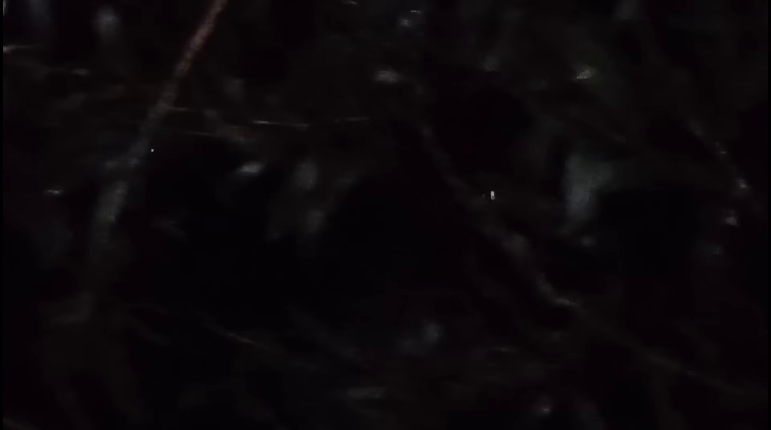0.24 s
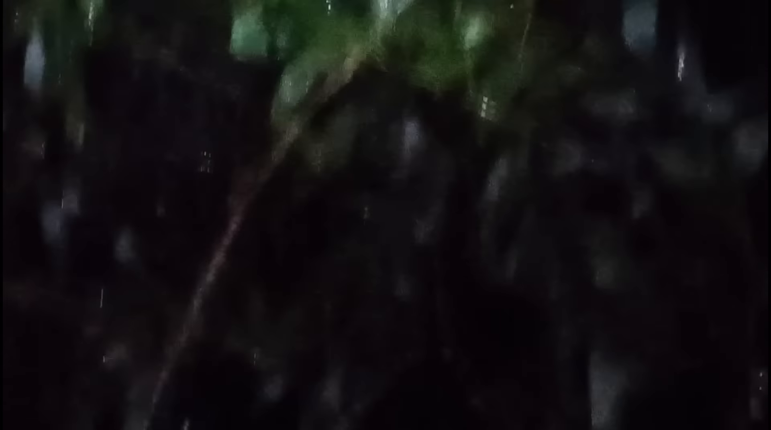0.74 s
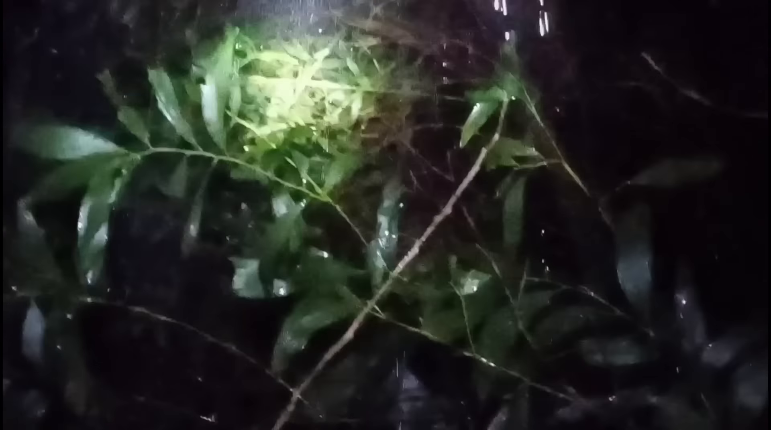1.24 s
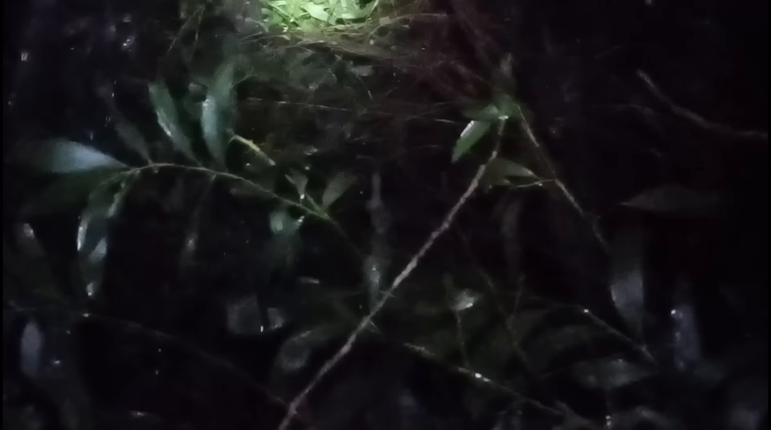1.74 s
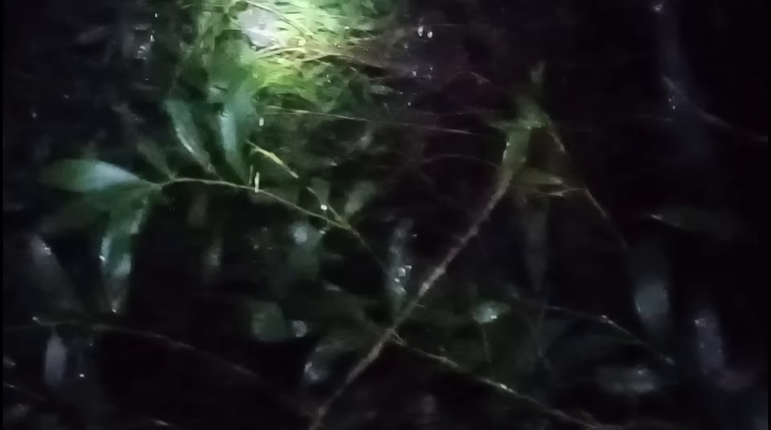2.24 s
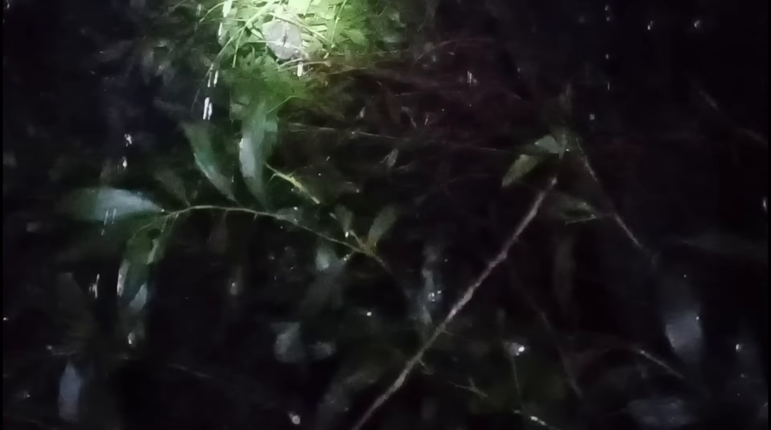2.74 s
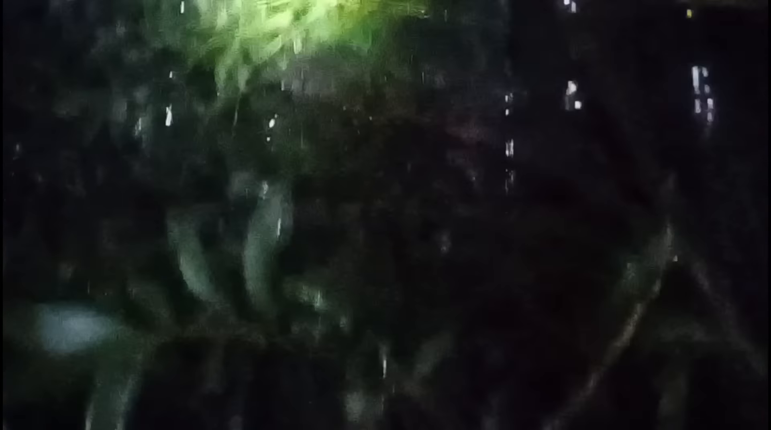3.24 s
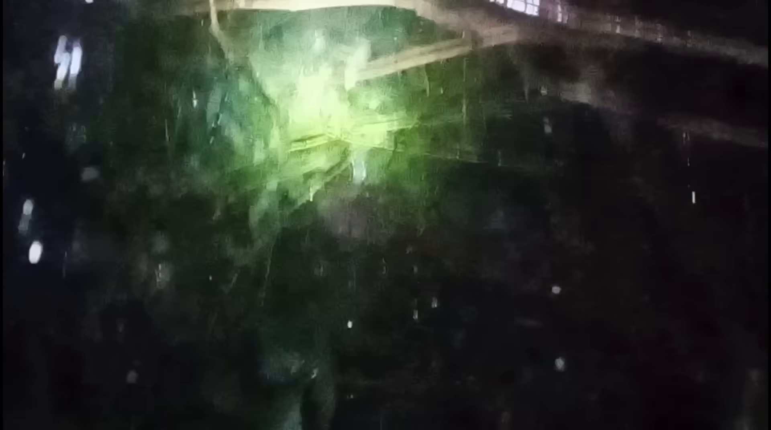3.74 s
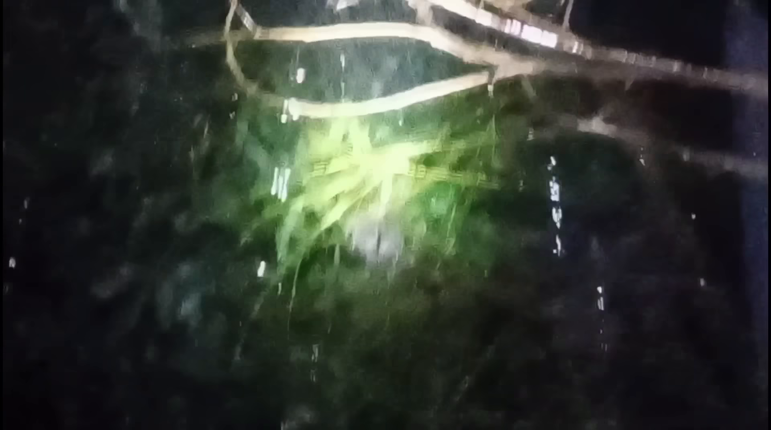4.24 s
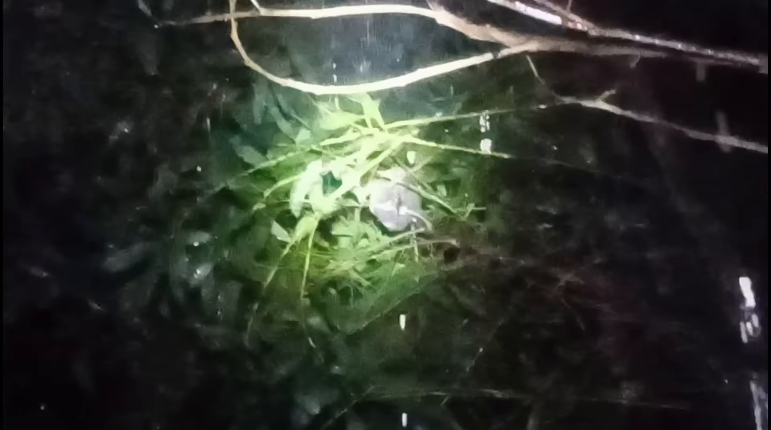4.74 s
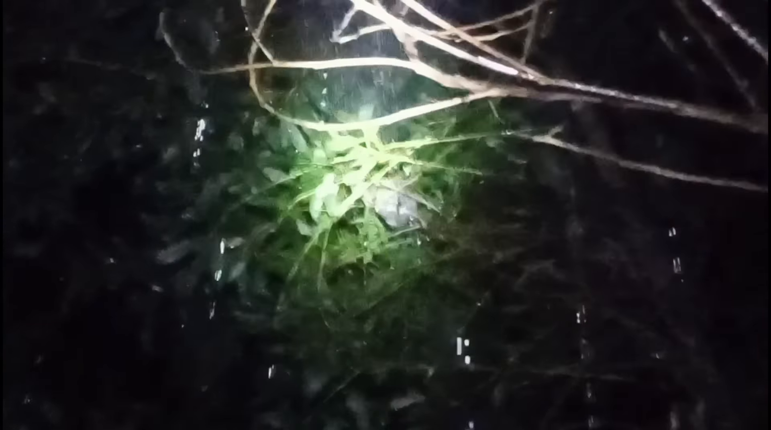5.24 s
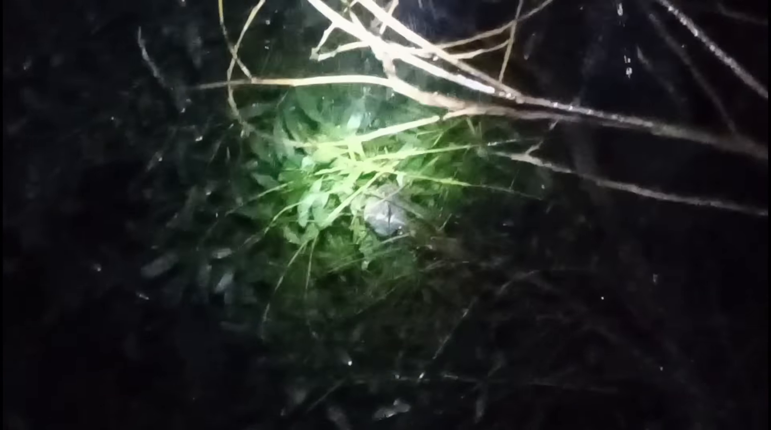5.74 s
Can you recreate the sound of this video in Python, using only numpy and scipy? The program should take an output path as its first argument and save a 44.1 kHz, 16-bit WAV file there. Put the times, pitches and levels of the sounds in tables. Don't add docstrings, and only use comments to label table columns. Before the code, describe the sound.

Steady rain falls on grass and leaves outdoors at night. Distant drops blend into a wide, even hiss, nearer ones patter, and the closest make single ticks and soft splats to either side. Past three seconds a breeze hits the left side of a hand-held phone microphone, adding low, lumpy rumble and dull thumps until the end.

```python
import sys
import numpy as np
from scipy import signal
from scipy.fft import rfft, irfft, next_fast_len
from scipy.io import wavfile
from scipy.ndimage import uniform_filter1d, map_coordinates

SR = 44100
rng = np.random.default_rng(int(sys.argv[2]) if len(sys.argv) > 2 else 0)


def transcribe(signal):
    frames = np.atleast_2d(signal).T
    limited = np.clip(frames, -1, 1)
    pcm = np.round(limited * 32767).astype(np.int16)
    wavfile.write(sys.argv[1], SR, pcm)


def gain_from_decibels(decibels):
    exponent = np.asarray(decibels, float) / 20
    return 10 ** exponent


N = 263713


def unit(x):
    return x / np.sqrt(np.mean(x ** 2) + 1e-20)


def along(points, hz):
    point_hz, value = np.transpose(points)
    return np.interp(np.log(hz + 1), np.log(point_hz + 1), value)


def curves(rows):
    s, *columns = np.transpose(rows)
    return [np.interp(np.arange(N) / SR, s, column) for column in columns]


def wobble(rate):
    knots = rng.standard_normal(int(N * rate / SR) + 4)
    return map_coordinates(knots, [np.arange(N) * rate / SR])


def filtered(x, response):
    size = next_fast_len(N + 8192)
    hz = np.fft.rfftfreq(size, 1 / SR)
    return irfft(rfft(x, size) * response(hz), size)[..., :N]


def causal(points):
    gain = gain_from_decibels(along(points, np.fft.rfftfreq(4096, 1 / SR)))
    cepstrum = irfft(np.log(gain))
    cepstrum[1:2048] *= 2
    cepstrum[2049:] = 0
    return irfft(np.exp(rfft(cepstrum)))[:2048]


# start_s, level_db, suction_to_push_ms (negative = push first)
STRONG_EDDIES = [(0.05, -35, 4), (2.45, -34, 4), (3.201, -29, -4.5), (3.453, -20.5, -4), (3.471, -22, 3.5),
                 (3.608, -25, 8), (3.724, -21, 5.5), (3.77, -20, 8.5), (3.94, -20.5, -4), (3.98, -14, 5.5),
                 (4.079, -25, -3.5), (4.117, -21, 8), (4.328, -24.5, 3.5), (4.403, -22, 5.5),
                 (4.517, -19.5, 5.5), (4.546, -19.5, 5.1), (4.629, -19.5, 4.2), (4.661, -21.5, 3),
                 (4.722, -23.5, 4), (4.807, -23.5, 2.5), (4.985, -20, 6), (5.061, -21, 3.5),
                 (5.078, -20, 3), (5.126, -17, 3.5), (5.338, -22, 4), (5.482, -23, -7.5), (5.574, -18, 4.5),
                 (5.741, -16.5, 4.5), (5.853, -20, 5), (5.895, -21, -6.5)]


def eddies(breeze_db, count):
    shedding_from_s, over_breeze_db, mean_ms = 3.3, 16.5, 5.7
    chance = rng.random((count, 4))
    when_s = shedding_from_s + chance[:, 0] * (N / SR - shedding_from_s)
    breeze_then_db = breeze_db[(when_s * SR).astype(int).clip(0, N - 1)]
    small_db = breeze_then_db + over_breeze_db + 11.0 * (chance[:, 1] - 0.5)
    push_first = np.where(chance[:, 3] < 0.25, -1, 1)
    small_ms = mean_ms * 2 ** (2.1 * (chance[:, 2] - 0.5)) * push_first
    pressure = np.zeros(N + 2000)
    t = np.arange(-1000, 1000) / SR
    for s, db, ms in list(STRONG_EDDIES) + list(zip(when_s, small_db, small_ms)):
        u = t / (ms / 2000)
        thump = (u - 0.2) * np.exp(-u ** 2 / 2)
        pressure[round(s * SR) - 1000:][:len(t)] += gain_from_decibels(db + 4.5) * thump
    return filtered(pressure[:N], lambda hz: hz ** 2 / (30 ** 2 + hz ** 2))


# time_s, level_db
BREEZE_STRENGTH = [(1.9, -62), (2.88, -60), (3.24, -57), (3.4, -48), (3.78, -44.5), (3.85, -58),
                   (3.95, -45), (4.4, -46.5), (4.47, -52), (4.6, -45), (4.86, -47), (5.1, -44), (5.28, -50),
                   (5.55, -43), (5.65, -44), (5.98, -41.5)]
# pitch_hz, level_db (per Hz)
BUFFET_SPECTRUM = [
    (15, -13),
    (40, -8),
    (80, -4),
    (150, -10),
    (260, -23.5),
    (500, -62),
]


def breeze():
    lee_db, lee_share = -51.5, 0.53
    left_db, = curves([(0, -95)] + list(BREEZE_STRENGTH))
    right_db = lee_db + lee_share * (left_db + 54.5)
    noise = filtered(rng.standard_normal((2, N)), lambda hz: gain_from_decibels(along(BUFFET_SPECTRUM, hz)))
    lumps = gain_from_decibels(2.9 * np.array([wobble(25), wobble(25)]))
    buffet = gain_from_decibels([left_db + 8.5, right_db]) * unit(noise * lumps)
    return buffet + np.array([eddies(left_db, count=60), np.zeros(N)])


PORT_GAP_S = 0.00047


def hiss(patchy_db, alike):
    spectrum = signal.stft(rng.standard_normal((2, N)), nperseg=512)[2]
    patches = rng.standard_normal(spectrum.shape[1:])
    patches = uniform_filter1d(uniform_filter1d(patches, size=8, axis=0), size=8, axis=1)
    pair = signal.istft(spectrum * gain_from_decibels(patchy_db * unit(patches)), nperseg=512)[1][:, :N]

    def middle_and_side(hz):
        likeness = np.clip(alike * np.sinc(2 * hz * PORT_GAP_S), -1, 1)
        angle = np.arccos(likeness) / 2
        return np.array([np.cos(angle), np.sin(angle)])

    mid, side = filtered(pair, middle_and_side)
    return unit(np.array([mid + side, mid - side]))


def taps(s, hz, cycles, db, size):
    life_s = cycles / hz
    start = np.floor(s * SR).astype(int)
    t = np.arange(size) / SR - (s - start / SR)[:, None]
    height = gain_from_decibels(db) / np.sqrt(hz / SR) / (life_s * SR)
    age = np.maximum(t, 0) / life_s[:, None]
    ring = np.sin(2 * np.pi * hz[:, None] * t) * age * np.exp(-age)
    at = np.clip(start[:, None] + np.arange(size), 0, N)
    return np.bincount(at.ravel(), (height[:, None] * ring).ravel(), N + 1)[:N]


def patter(count, centre_hz, octaves, db, spread_db, shadow_db, size):
    chance = rng.random((count, 5))
    s = chance[:, 0] * N / SR
    hz = np.clip(centre_hz * 2 ** (octaves * (2 * chance[:, 1] - 1)), 200, 15000)
    level_db = db - spread_db * np.log(chance[:, 2] + 0.007)
    side = 2 * chance[:, 3] - 1
    cycles = 0.16 + 0.5 * chance[:, 4]
    ports = []
    for way in (1, -1):
        arrival_s = s - way * side * PORT_GAP_S / 2
        ports.append(taps(arrival_s, hz, cycles, level_db + way * shadow_db * side, size))
    return np.array(ports)


# start_s, pitch_hz, spread_octaves, left_db, right_db (over the hiss)
LEAF_SPLATS = [(0.2172, 2900, 0.55, 15, 10.5), (0.219, 606, 0.62, 16.5, 16), (4.873, 5400, 0.24, 12.5, 18),
               (0.2732, 1310, 0.75, 17, 13.5), (0.479, 607, 0.61, 11, 9), (0.63, 397, 0.84, 11, 12),
               (0.8065, 600, 1.5, 9, 7), (1.2176, 400, 1.2, 12, -2), (1.0374, 3400, 0.53, 14.5, 17),
               (1.982, 2570, 1, 6, 12), (2.0345, 2420, 1.07, 18, 20), (2.1335, 644, 0.74, 12, 12),
               (2.4421, 1010, 1.2, 8.5, 11), (3.2522, 2000, 1.3, -3, 14), (0.2465, 520, 0.7, 10, 9),
               (3.6121, 1340, 1.9, 3, 12.5), (3.8927, 520, 1.4, 7, 6), (0.295, 900, 0.65, 10, 10),
               (4.5546, 1690, 1.24, 17, 20.5), (4.9192, 3120, 0.58, 7, 12), (5.0067, 390, 1.16, 19.5, 4),
               (5.058, 1000, 1.0, 8, 15), (5.0691, 1090, 1.2, 9, 18), (5.4814, 474, 0.62, 20, 20)]
# start_s, pitch_hz, left_db, right_db (over the hiss)
GRASS_TICKS = [(0.0618, 8720, 17, 5), (0.5385, 6540, 17, 12.5), (0.836, 8750, 15.5, 11.5),
               (1.6274, 9850, 15, 15), (1.813, 8380, 14, -3), (1.8862, 10000, 19, 5), (1.886, 14500, 17, 2),
               (2.1471, 7780, 17, 8.5), (2.7948, 6600, 13.5, 13), (3.0584, 8850, 13, 5),
               (3.4534, 4600, 8, 16), (3.6574, 4750, 13, 14.5), (3.661, 5500, 9.5, 15),
               (3.9778, 4090, 16, 15), (3.751, 9700, 9.5, 17), (3.771, 9400, 8, 20), (3.794, 8590, 16, 12),
               (3.986, 5100, 17, 15), (4.39, 7300, 10, -3), (4.484, 9850, 13, 3.5), (4.6718, 8200, 12, -6),
               (4.6704, 15000, 30, 3), (4.757, 6140, 19, -3), (0.2652, 4150, 14, 11),
               (5.1876, 8140, 11.5, 13), (5.38, 4630, 5, 14), (5.4094, 8350, 15, 10),
               (5.5715, 8200, 15.5, 16), (5.8052, 10000, 16, 14.5), (5.8043, 14870, 20, 1)]


def near_drops():
    tick_spread_octaves = 0.71
    ticks = [(s, hz, tick_spread_octaves, left, right) for s, hz, left, right in GRASS_TICKS]
    s, hz, spread, left_db, right_db = np.transpose(list(LEAF_SPLATS) + ticks)
    crack_db = -11.5 - 1.5 * np.log2(np.maximum(hz / 4000, 1))
    cycles = 0.46 / np.clip(spread, 0.15, 3)
    side = np.tanh((left_db - right_db) / 8)
    ports = []
    for way, db in ((0.97, left_db), (-1.26, right_db)):
        start_s = s - cycles / hz - way * side * PORT_GAP_S / 2
        ring = taps(start_s, hz, cycles, db + 9.0, size=900)
        crack = taps(start_s, 1.4 * hz.clip(0, 6000), 0.16 + 0 * hz, db + crack_db + 12.5, size=200)
        ports.append(filtered(ring + crack, lambda f: (1j * f / (200 + 1j * f)) ** 2))
    echo = np.zeros((2, 400))
    echo[:, 0] = 1
    echo[:, 30::37] = gain_from_decibels(-14.0) * rng.standard_normal((2, 10)) * np.exp(-np.arange(10) / 4)
    return signal.fftconvolve(ports, echo, axes=1)[:, :N]


# time_s, level_db
RAIN_STRENGTH = [
    (0, -29),
    (1, -28.5),
    (2, -28.5),
    (3, -28.5),
    (3.6, -28.5),
    (4.2, -29),
    (5, -29),
    (5.98, -28.5),
]
# pitch_hz, gain_db
LEFT_RESONANCES = [(60, -20), (170, -11), (900, -11), (1650, -10), (2800, -5), (4100, -9), (6200, -20),
                   (7200, -9), (8200, -3.5), (9500, -12), (12200, -16.5), (13800, -56), (15300, -46),
                   (16400, -81)]
# pitch_hz, gain_db
RIGHT_RESONANCES = [(60, -19), (170, -13), (1050, -9), (1650, -10), (2800, -2.5), (4100, -1.17),
                    (5600, 2.5), (6400, -0.1), (7600, -17), (9300, -22.5), (11800, -17.5), (13600, -11),
                    (15350, -16), (15700, -76)]


def rain():
    level_db, = curves(RAIN_STRENGTH)
    low_db = 1.06 - 0.4259 * np.arange(N) / SR
    spray = patter(count=9000, centre_hz=6100, octaves=1.31, db=0, spread_db=3, shadow_db=7.0, size=100)
    thuds = patter(count=900, centre_hz=780, octaves=1.85, db=1.0, spread_db=3, shadow_db=7.0, size=500)
    swell = gain_from_decibels(0.13 * wobble(4.15) + 0.27 * wobble(20))
    far = gain_from_decibels(-2.0) * hiss(patchy_db=0.59, alike=0.99) * swell
    air = far + spray + thuds + near_drops()
    low = filtered(air, lambda hz: 1 / (1 + (hz / 3000) ** 4))
    air = gain_from_decibels(level_db + 13) * (air + (gain_from_decibels(low_db) - 1) * low)
    return signal.fftconvolve(air, [causal(LEFT_RESONANCES), causal(RIGHT_RESONANCES)], axes=1)[:, :N]


def scene():
    return breeze() + rain()


def low_pass(x):
    return signal.sosfilt(signal.butter(12, 15830, fs=SR, output="sos"), x)


def record(dry):
    return low_pass(dry)


dry = scene()
out = record(dry)
transcribe(out)
```